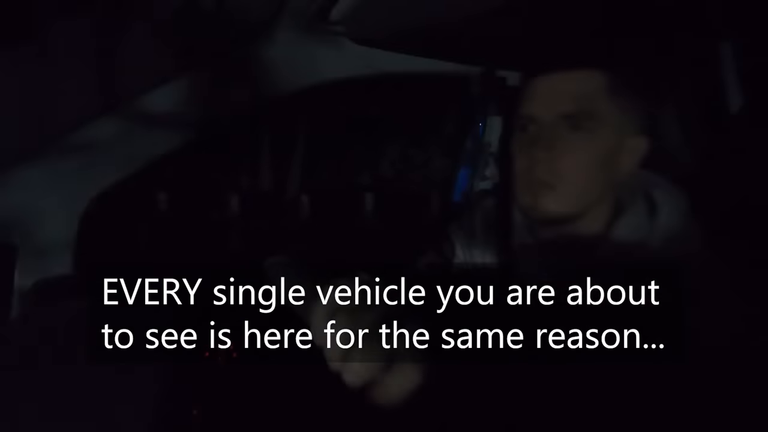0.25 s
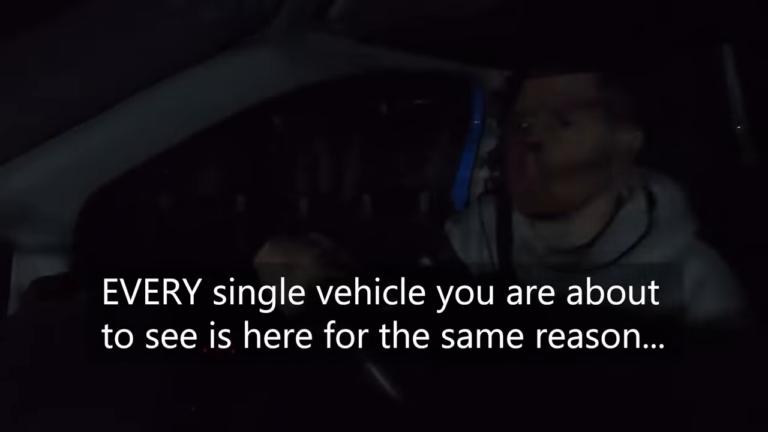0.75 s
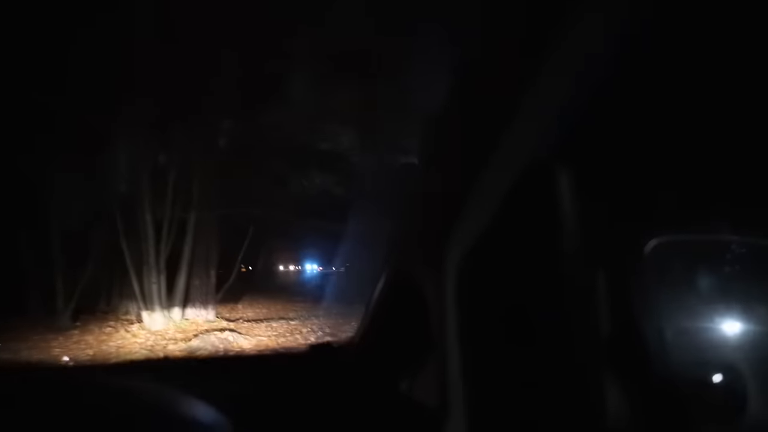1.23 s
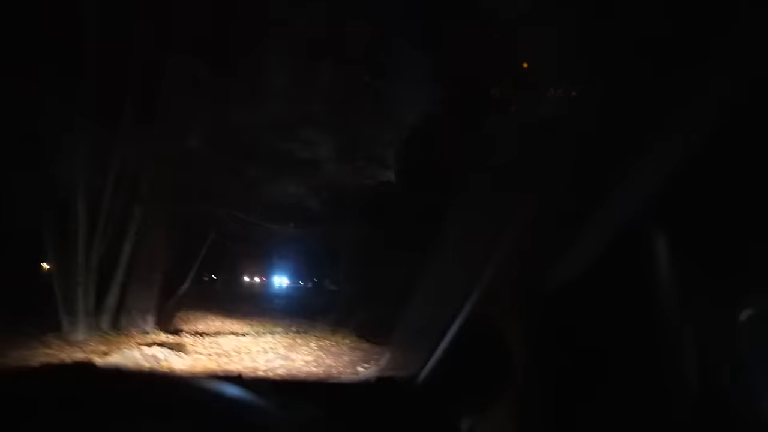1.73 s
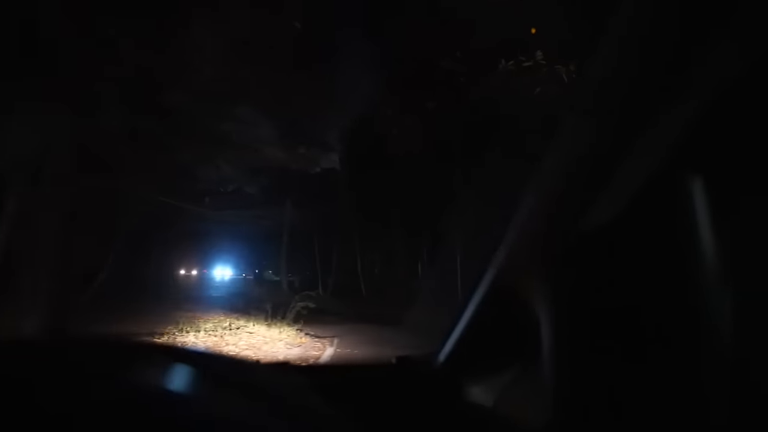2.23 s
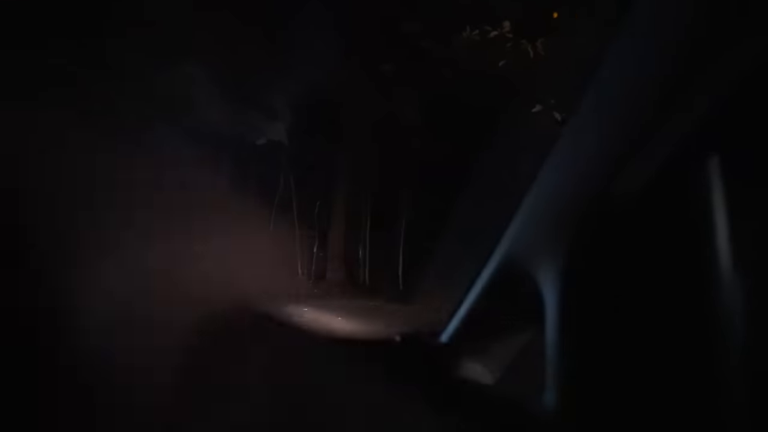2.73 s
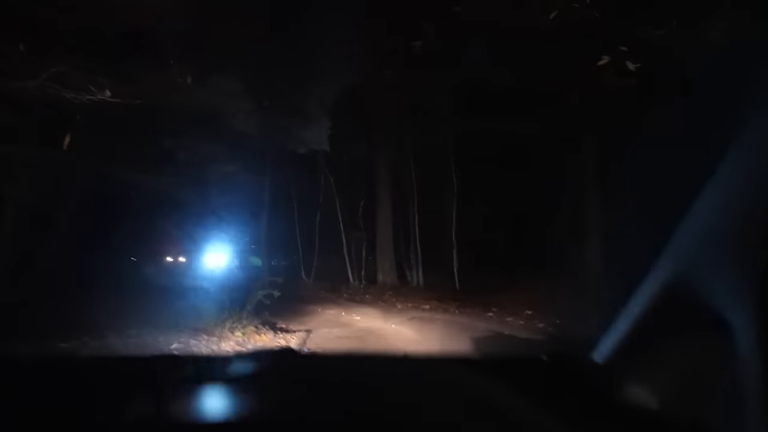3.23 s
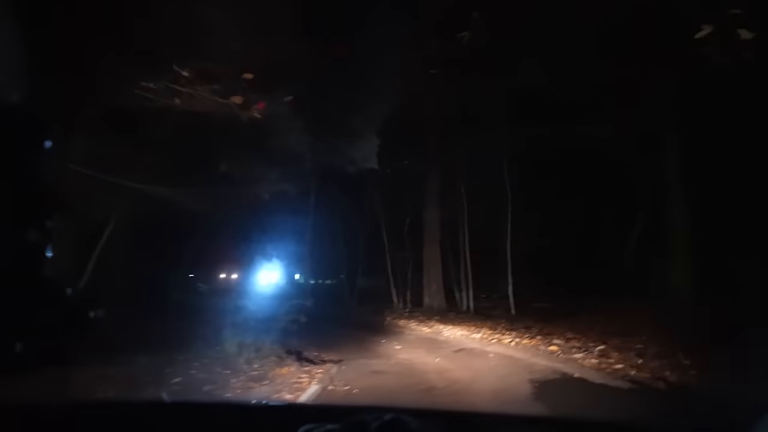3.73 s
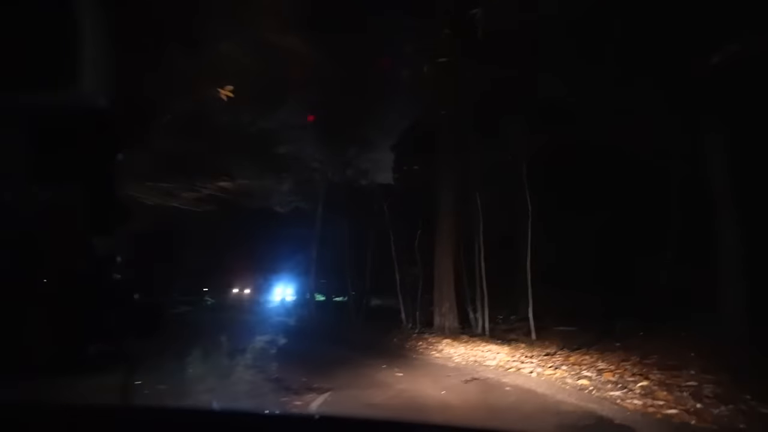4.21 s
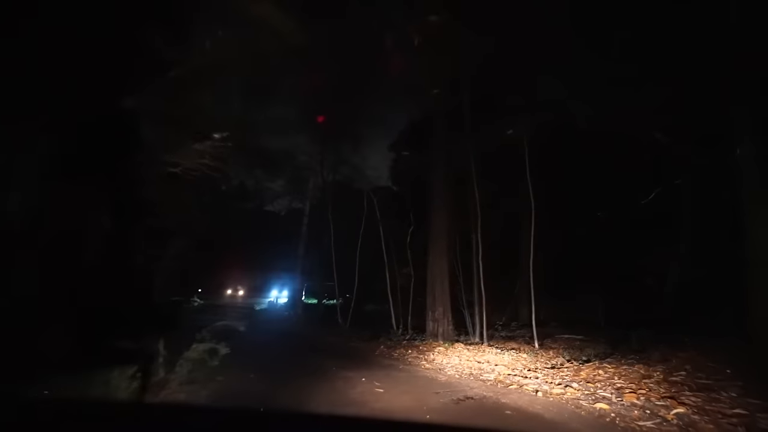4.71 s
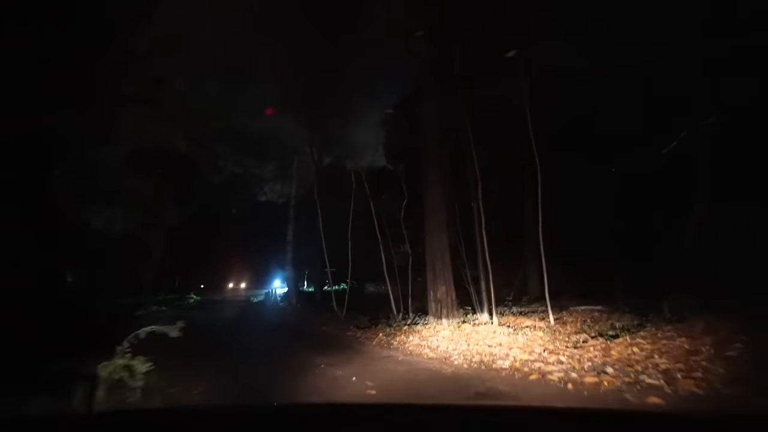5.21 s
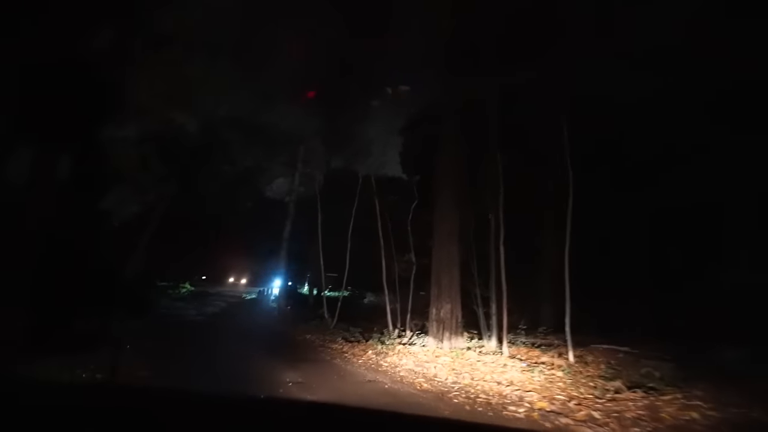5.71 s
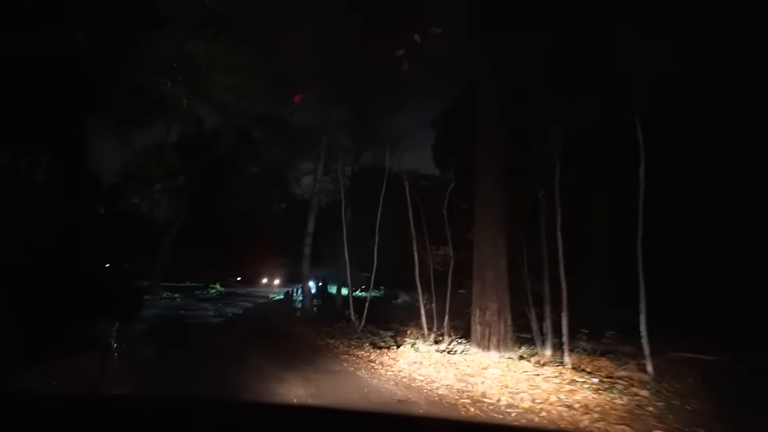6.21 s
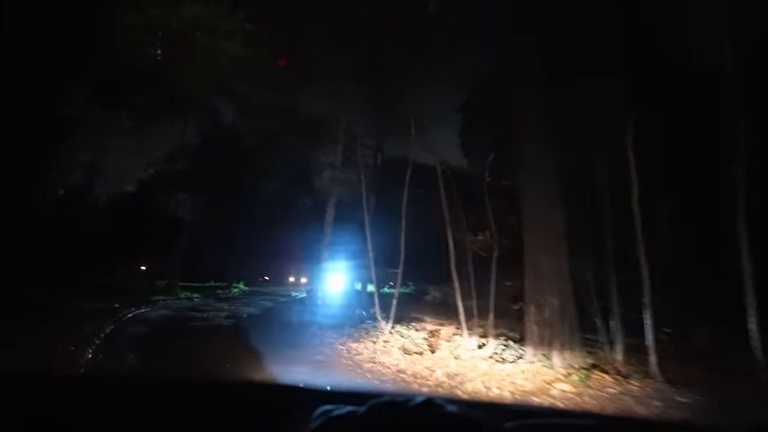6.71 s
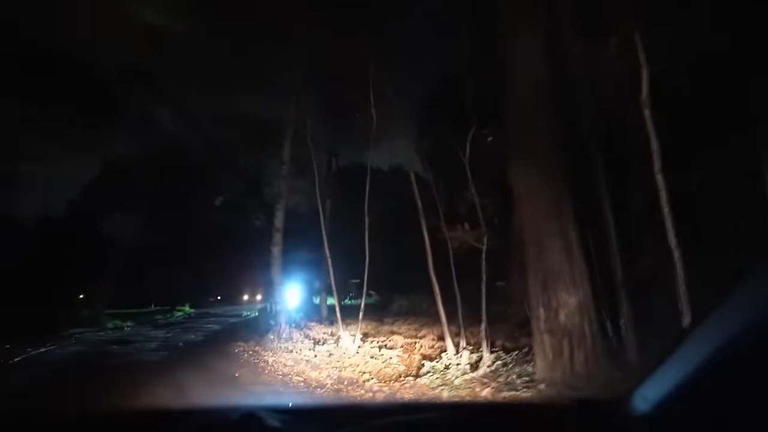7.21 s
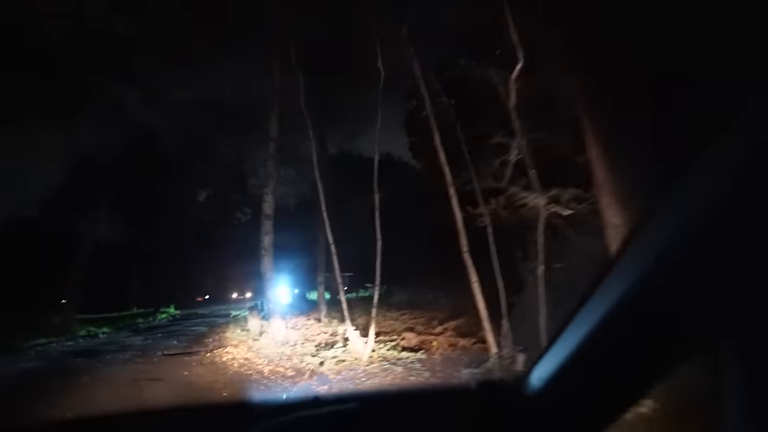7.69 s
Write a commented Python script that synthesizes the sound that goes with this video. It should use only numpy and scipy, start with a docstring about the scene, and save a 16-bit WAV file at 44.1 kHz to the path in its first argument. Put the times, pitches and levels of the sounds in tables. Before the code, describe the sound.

Low-revving van engine drones in a closed cabin over rough ground, with tyre crunch, jangling keys, sleeve swishes and trim rattles.

```python
"""An engine at low revs hums through the cabin of a small van on a bumpy track: a harmonic series of sines
follows speed and load. Filtered noise gives the belt's chirp, drivetrain whirr, body rumble, an early deep
flutter of air, tyre crunch and the swish of hands and sleeves on the wheel. Keys and their ring jingle as
decaying sines; loose trim knocks as noise bursts with short modes. Random slips excite creaking trim and a
skidding palm."""
import sys
import numpy as np
from scipy import signal
from scipy.fft import rfft, irfft
from scipy.io import wavfile
from scipy.ndimage import uniform_filter1d

SR = 44100
rng = np.random.default_rng(int(sys.argv[2]) if len(sys.argv) > 2 else 0)


def materialize(psi):
    """Save the field psi as 16-bit PCM at rate SR to the path in sys.argv[1].

    A 1-D psi becomes a single channel; in a 2-D psi each row is a channel.
    """
    bounded = np.clip(np.atleast_2d(psi).T, -1, 1)
    quanta = np.round(bounded * 32767).astype(np.int16)
    wavfile.write(sys.argv[1], SR, quanta)


N = 350595
TIME = np.arange(N) / SR
FREQS = np.maximum(np.fft.rfftfreq(N, 1 / SR), 1)
TOP_HZ = 16000

# Levels in the tables are relative; each source sets its own gain. Widths are full widths unless noted.
# engine speed: t/s, firing rate f/Hz
FIRING_RATE = [(0, 35.5), (.8, 40.6), (1.1, 41.1), (1.47, 37.17), (2.6, 32.37), (3.2, 34.46), (3.95, 34),
               (4.43, 37.4), (4.8, 37.15), (5.05, 39.06), (5.5, 39.2), (5.8, 40.24), (6.3, 40.3),
               (6.55, 42.32), (7.05, 42.71), (7.25, 43.5), (7.9, 43.07)]
# throttle: t/s, engine load level/dB
ENGINE_LOAD = [(.55, -63), (.9, -35.5), (1.38, -41), (1.65, -49), (3.1, -49), (3.5, -45), (4.16, -48.5),
               (4.23, -37), (5, -35.5), (5.3, -43), (6.5, -36.5), (7.9, -38.5)]
# engine harmonics: multiple of the firing rate [1], level/dB against the load
ENGINE_HARMONICS = [(1, -15), (2, -1.5), (3, -1), (4, 1.5), (5, -10.5), (6, -15.5), (7, -14), (8, -21.5),
                    (9, -18.5), (10, -18.5)]
# standing waves of the cabin: f/Hz, half width/Hz, lift/dB
CABIN_BOOMS = [(121.4, 2.4, 5), (146.7, 9.3, 6.5), (194.6, 3.1, 7.5), (376.7, 7.1, 7.5)]
# unsteadiness of the engine: share of its speed, level/dB of each multiple
ENGINE_JITTER, ENGINE_WAVER_DB = .002, 1.2

# firings in one turn of the drive belt
BELT_FIRINGS = 4.3
# drivetrain resonances: f/Hz, width/Hz, level/dB
WHIRR_RESONANCES = [(713, 67, 1.5), (840, 110, -8.5), (1297, 65, -3.5)]
# louder whirr in the turns: start t/s, length/s, level/dB
TURN_SWELLS = [(.7, 1.96, -57), (2.2, 1.6, -54.5)]

# rolling along the track: t/s, body rumble level/dB, panel drone level/dB, tyre crunch level/dB
ROLLING_LEVELS = [(0.15, -62, -50.5, -65), (0.21, -70, -51.5, -60), (0.37, -51, -50.5, -66.5),
                  (0.97, -31.5, -43.5, -60.5), (2.23, -36, -49.5, -65.5), (3.1, -36.5, -49, -60),
                  (3.63, -36.3, -45.5, -57.5), (6.75, -30, -44, -56), (7.84, -29.5, -45, -56.5),
                  (7.95, -27.5, -43, -56.5)]
# deeper ruts that jolt the body: start t/s, length/s, rumble level/dB
RUT_SWELLS = [(5.45, 0.19, -34.5), (5.66, 0.23, -29), (6.92, 0.42, -31), (7.58, 0.15, -28)]
# spectrum of the body rumble: f/Hz, level/dB per Hz
BODY_SPECTRUM = [(25, -55), (40, -11), (60, -9.5), (86, 2), (110, -6.5), (140, -6.5), (175, -11.5),
                 (215, -18), (300, -32)]
# spectrum of the panel drone: f/Hz, level/dB per Hz
PANEL_SPECTRUM = [(130, -21), (210, 0.5), (280, 1), (325, -14.5), (390, -2.5), (480, -4.5), (620, -9.5),
                  (1000, -13.5), (3000, -51)]
# panel resonances: f/Hz, width/Hz, level/dB
PANEL_RESONANCES = [(298.5, 5.9, 7), (358.6, 46, 3)]

# spectrum of the tyre crunch: f/Hz, level/dB per Hz
TYRE_SPECTRUM = [(350, -16), (560, 7), (1300, 4.5), (1750, 3.5), (2150, 0), (2650, 1), (3250, -4),
                 (4200, -9), (6000, -17), (16000, -18.5)]
# wheel arch resonances: f/Hz, width/Hz, level/dB
ARCH_RESONANCES = [(1100, 87, -8.5), (1407, 115, -3), (2120, 130, -2.5), (3190, 210, -9)]
# wander of the arch resonances: share of their pitch, level/dB
ARCH_DRIFT, ARCH_WANDER_DB = .022, 1.9
# crackling stones and twigs: rate per second, scatter in size/dB, level/dB against the hiss before filtering
GRIT_PER_S, GRIT_SCATTER_DB, GRIT_DB = 220, 4.4, -6.5
# rise of the fluttering air: t60/s
FLUTTER_RISE_T60 = .03

# strokes of hands and sleeves over the wheel: start t/s, length/s, level/dB
HAND_STROKES = [(0, 0.54, -74), (.63, 0.67, -57), (.85, 0.12, -52), (1.005, 0.046, -53.5),
                (2.58, 0.19, -74), (2.8, 0.46, -57), (3.2, 0.39, -63.5), (3.43, 0.44, -58.5),
                (4.12, 0.68, -59.5), (4.74, 0.21, -60.5), (4.85, 0.044, -49.5), (5.38, 0.5, -60.5)]
# spectrum of rubbing cloth: f/Hz, level/dB per Hz
CLOTH_SPECTRUM = [(1180, -58), (2000, -0.5), (3040, 4), (3650, 4), (5630, 4.5), (9090, 2), (13300, 4.5),
                  (15200, 3), (16000, -9)]
# shares of its length over which a gentle swell rises and dies away
RISE_SHARE, FALL_SHARE = .26, .45

# clashes in the bunch: t/s, ring level/dB of the tiny, small, medium and large key
KEY_CLASHES = [(0.021, -45, -29.5, -47, -39), (0.219, -73, -50, -62, -63), (0.2633, -56, -45, -38.5, -45),
               (0.3156, -57, -50, -37.5, -58), (0.5746, -45, -28.5, -48, -37), (0.592, -45, -33, -47, -37),
               (0.608, -49, -35.5, -53, -39), (1.3254, -53, -58, -62, -63), (1.5712, -54, -55, -55, -57),
               (1.708, -76, -64, -70, -67), (1.914, -50, -56, -66, -62), (2.031, -65, -61, -74, -62),
               (2.3778, -55, -57, -73, -61), (2.3945, -50.5, -63, -75, -56), (2.8444, -50, -57, -65, -60),
               (3.2161, -50, -56, -65, -54), (3.3433, -40, -40, -64, -61), (3.374, -41, -54, -62, -60),
               (3.479, -43.5, -51, -57, -60), (3.9749, -54, -58, -69, -59), (4.353, -48, -59, -64, -58),
               (4.6309, -56, -54, -62, -60), (4.9262, -50, -64, -71, -70), (5.0534, -45, -51, -62, -59),
               (5.9407, -37, -39.5, -51, -58), (6.0985, -29, -35, -60, -41), (6.2866, -34, -31, -37, -53),
               (6.323, -29, -27.5, -41, -53), (6.548, -40, -44.5, -44, -43), (6.7291, -57, -60, -69, -52),
               (7.0519, -66, -53, -69, -68), (7.1317, -76, -55, -57, -58), (7.2549, -57, -64, -76, -72),
               (7.3811, -52, -48.5, -54, -72), (7.5717, -57, -49, -56, -55),
               (7.7447, -28, -33, -39.5, -40.5)]
# modes of the keys: key 0-3 (tiny to large), f/Hz, level/dB, t60/s
KEY_RESONANCES = [(0, 13808, 0, .45), (1, 10712, -3, .17), (1, 10960, 0, .065), (2, 6788, 0, .09),
                  (3, 5750, 0, .07)]
# scrape of edge on edge at each clash: t60/s
TICK_T60 = .045
# shortest and longest wait for the one rebound after a clash: t/s
REBOUND_S = (.005, .02)
# scatter in strength of the random grazes, and waver of a ring as the bunch swings: level/dB
GRAZE_SCATTER_DB, SWING_DB = 4, 3.5
# steel ring that holds the keys: t/s, level/dB, time of free ringing/s
RING_STRIKES = [(0.03, -67, 0.45), (5.942, -61.5, 0.19), (6.102, -50.5, 0.21), (7.82, -69, .12)]
# tiny key brushed by the swinging bunch: start t/s, length/s, level/dB
KEY_BRUSHES = [(1.62, 0.56, -68), (6.48, .24, -48), (6.95, .7, -66)]

# taps of loose trim: t/s, crack level/dB, top of the crack f/Hz, thud level/dB, centre of the thud f/Hz
TRIM_TAPS = [(.2137, -47, 4500, -51, 1400), (.9145, -34, 7000, -53, 2100), (1.3772, -53, 6000, -41, 1450),
             (1.5575, -48, 4000, -36, 850), (2.8317, -31, 12000, -47, 2100), (4.1175, -46, 6000, -43, 2100),
             (4.8773, -32, 6000, -57, 2500), (5.178, -32, 14000, -45, 1400),
             (5.2475, -27, 14000, -44, 2400), (5.7199, -35, 5500, -38, 2200),
             (6.3987, -40, 5000, -43, 2300), (6.832, -41, 6000, -39, 1900), (7, -38, 12000, -52, 2100),
             (7.4414, -56, 3500, -35, 870), (7.6456, -35.5, 6500, -42, 2200),
             (7.6597, -48, 5000, -36, 1050), (7.667, -50, 4000, -42, 2000)]
# modes of the trim: f/Hz, level/dB, t60/s
TRIM_RESONANCES = [(600, -1, .06), (930, -1, .045), (1430, -1, .04), (2104, -6, .03), (2570, -6, .03)]
# octaves from a tap's pitch at which the gain of a mode falls to 1/e
TAP_REACH_OCTAVES = 0.95
# rise of a whole tap and decay of its crack: t60/s
TAP_RISE_T60, CRACK_T60 = .002, .018
# factor by which the thud's band reaches below and above its pitch, and level/dB of the bounce
THUD_SPAN, BOUNCE_DB = 1.35, -12

# creaks of trim under strain: start t/s, length/s, level/dB
CREAK_SWELLS = [(.87, 0.06, -53), (4.73, 0.14, -52.5), (4.85, 0.034, -41.5)]
# resonances of the rasping trim: f/Hz, width/Hz, level/dB
CREAK_RESONANCES = [(3520, 350, 5), (4300, 480, 4), (6300, 900, -12)]
# shares of its length over which a creak mounts and breaks off
CREAK_RISE_SHARE, CREAK_FALL_SHARE = .85, .12

# palm skidding along the rim: start t/s, length/s, level/dB
PALM_SKIDS = [(2.925, 0.26, -47), (5.17, 0.095, -49), (5.244, 0.09, -43)]
# spectrum of the skidding palm: f/Hz, level/dB per Hz
PALM_SPECTRUM = [(1500, -30), (2000, -8.5), (4000, -1), (6000, 4.5), (9500, 5), (13000, 9.5), (15500, 3)]
# resonances of the rim under the palm: f/Hz, width/Hz, level/dB
RIM_RESONANCES = [(2154, 330, 3.5), (3200, 530, 1.5), (4460, 450, -3)]
# side against mid in the cabin: f/Hz, level/dB
STEREO_WIDTH = [(30, -29), (60, -21), (130, -23.5), (250, -7), (1000, -5.5), (2500, -1), (14000, 2)]


def undb(db):
    """Logarithmic level: decibels to amplitude gain."""
    return 10 ** (np.asarray(db) / 20)


def unit(x):
    """Normalisation to an rms of 1."""
    return x / np.sqrt(np.mean(x ** 2))


def curves(table):
    """Linear interpolation in time of every column of a table."""
    s, *columns = np.transpose(table)
    return [np.interp(TIME, s, column) for column in columns]


def walk(rate):
    """Smoothed random steps, held 1 / rate seconds and slewed twice; spread near 1."""
    hold = int(SR / rate)
    steps = np.repeat(rng.standard_normal(N // hold + 1), hold)
    return 1.3 * uniform_filter1d(uniform_filter1d(steps, hold), hold)[:N]


def fade(t, t60):
    """Exponential decay by 60 dB in t60 seconds."""
    return np.exp(-np.log(1000) * t / t60)


def swells(table, rise_share=RISE_SHARE, fall_share=FALL_SHARE):
    """Power addition of overlapping gestures, each a smooth rise, hold and fall; gives a gain."""
    power = np.zeros(N)
    for s, length_s, db in table:
        i = slice(max(int(s * SR), 0), int((s + length_s) * SR))
        along = (TIME[i] - s) / length_s
        shape = np.clip(np.minimum(along / rise_share, (1 - along) / fall_share), 0, 1)
        power[i] += (undb(db) * np.sin(np.pi / 2 * shape)) ** 2
    return np.sqrt(power)


def noise():
    """Statistical independence: two unrelated white noises."""
    return rng.standard_normal((2, N))


def band_noise(lo_hz, hi_hz, size):
    """Band limitation of a short stretch of two-channel noise, at an rms of 1."""
    sos = signal.butter(2, [lo_hz, min(hi_hz, SR / 2 - 100)], "band", fs=SR, output="sos")
    return unit(signal.sosfilt(sos, rng.standard_normal((2, size))))


def response(points):
    """Spectral shaping: gain through the given points, with skirts that fall away beyond the ends."""
    hz, db = np.transpose(points)
    skirts = np.minimum(FREQS / hz[0], 1) ** 2 * np.minimum(hz[-1] / FREQS, 1) ** 2
    return undb(np.interp(np.log(FREQS), np.log(hz), db)) * skirts


def resonance(hz, width_hz):
    """Damped oscillator: complex response with gain 1 at its centre."""
    return 1 / (1 + 1j * (FREQS ** 2 - hz ** 2) / (FREQS * width_hz))


def ringing(modes):
    """Modal summation: gain of several resonances, each squared for steeper flanks."""
    # squaring narrows the peak, so the width is widened to make up for it
    return sum(undb(db) * np.abs(resonance(hz, 1.4 * width_hz)) ** 2 for hz, width_hz, db in modes)


def cabin(pair, gain):
    """Diffuse field: coloured excitations, alike in both ears in the bass and unlike in the treble; rms 1."""
    mid, side = rfft(pair) * gain
    side = side * response(STEREO_WIDTH)
    return unit(irfft([mid + side, mid - side], N))


def pan(db):
    """Interaural level difference: left and right gains."""
    return undb(np.array([[db], [-db]]) / 2)


def glide(pair, ratio):
    """Time-varying resampling: pitch shifted by a ratio that changes in time."""
    position = np.cumsum(ratio) % N
    return np.array([np.interp(position, np.arange(N), ear) for ear in pair])


def add(out, s, sound):
    """Superposition of a sound that starts at s seconds."""
    i = min(max(int(s * SR), 0), N)
    out[:, i:i + sound.shape[1]] += sound[:, :N - i]


def engine(level_db=-1.0, ear_lag=0.1):
    """Harmonic series of the firing rate, scaled by load and lifted where it crosses cabin standing waves."""
    hz = curves(FIRING_RATE)[0] * (1 + ENGINE_JITTER * walk(14))
    phase = 2 * np.pi * np.cumsum(hz) / SR
    load_db, = curves(ENGINE_LOAD)
    # radians; standing waves put the multiples to alternate sides
    ears = ear_lag * np.array([[-1], [1]])
    hum = 0
    for multiple, db in ENGINE_HARMONICS:
        k = round(multiple)
        boom_db = 0
        for boom_hz, half_width_hz, lift_db in CABIN_BOOMS:
            boom_db = boom_db + lift_db / (1 + ((k * hz - boom_hz) / half_width_hz) ** 2)
        gain = undb(load_db + db + boom_db + ENGINE_WAVER_DB * walk(10))
        hum = hum + gain * np.sin(k * phase + (-1) ** k * ears + rng.uniform(0, 2 * np.pi))
    return np.sqrt(2) * undb(level_db) * hum


def belt(level_db=-63, hz=3130, width_hz=200, chirp_share=0.12):
    """Periodic excitation: a worn patch of the belt chirps softly each time it meets the pulley."""
    turn = np.cumsum(curves(FIRING_RATE)[0]) / SR / BELT_FIRINGS % 1
    chirp = np.exp(-((turn - .5) / chirp_share) ** 2)
    return undb(level_db + walk(6.1)) * chirp * cabin(noise(), ringing([(hz, width_hz, 0)]))


def whirr(turn_db=2.0, straight_db=-13, rest_hz=34, pitch_law=.33):
    """Resonant noise of the drivetrain, louder in the turns; its pitch is a power law of engine speed."""
    gain = np.hypot(undb(curves(ROLLING_LEVELS)[1] + straight_db), undb(turn_db) * swells(TURN_SWELLS))
    # rest_hz is the firing rate at which the pitch is unshifted
    ratio = (curves(FIRING_RATE)[0] / rest_hz) ** pitch_law
    return gain * glide(cabin(noise(), ringing(WHIRR_RESONANCES)), ratio)


def track(shake_db=1.5):
    """Forced vibration: rough ground shakes the body into rumble and its panels into a resonant drone."""
    rumble_db, drone_db, _ = curves(ROLLING_LEVELS)
    body_gain = np.hypot(undb(rumble_db), swells(RUT_SWELLS))
    body = body_gain * cabin(noise(), response(BODY_SPECTRUM))
    panel_gain = undb(drone_db + shake_db * walk(25))
    panels = panel_gain * cabin(noise(), response(PANEL_SPECTRUM) + ringing(PANEL_RESONANCES))
    return body + panels


def tyres(hiss_db=7.0, arch_db=-2, shake_db=1.85, pan_db=-2.0):
    """Impulsive and steady excitation: stones crackle and dirt hisses, ringing drifting wheel arch modes."""
    sizes = undb(GRIT_SCATTER_DB * np.minimum(rng.exponential(size=N), 4))
    hits = rng.random(N) < GRIT_PER_S / SR
    grit = unit(np.sign(noise()) * sizes * hits)
    ground = noise() + undb(GRIT_DB) * grit
    sound = undb(hiss_db) * cabin(ground, response(TYRE_SPECTRUM))
    for hz, width_hz, db in ARCH_RESONANCES:
        ring = glide(cabin(ground, ringing([(hz, width_hz, db)])), 1 + ARCH_DRIFT * walk(0.99))
        sound = sound + undb(arch_db + db + ARCH_WANDER_DB * walk(2)) * ring
    crunch_db = curves(ROLLING_LEVELS)[2]
    return pan(pan_db) * undb(crunch_db + shake_db * walk(30)) * sound


def air_flutter(level_db=-21, onset_db=9, onset_s=0.23, sink_db_per_s=5, end_s=0.99, end_t60=0.094,
                centre_hz=19, width_hz=11):
    """Narrow-band noise: a deep flutter of air below the engine note, strongest at first, then sinking."""
    flutter = irfft(rfft(rng.standard_normal(N)) * resonance(centre_hz, width_hz) ** 2, N)
    # dividing by its running rms keeps the flutter even
    running_rms = np.sqrt(np.abs(uniform_filter1d(flutter ** 2, size=6000)))
    db = level_db + onset_db * np.exp(-TIME / onset_s) - sink_db_per_s * TIME
    # it fades out quickly after end_s
    envelope = (1 - fade(TIME, FLUTTER_RISE_T60)) * fade(np.maximum(TIME - end_s, 0), end_t60)
    return undb(db) * flutter / running_rms * envelope


def swishes(level_db=9.5, rough_db=1.54, rest_db=-67, catch_db=-4, catches_per_s=1500):
    """Sliding friction: cloth and palms hiss over the wheel rim with fine, random catches."""
    slide = swells(HAND_STROKES) * undb(level_db + rough_db * walk(180))
    catches = undb(catch_db) * unit(1.0 * (rng.random(N) < catches_per_s / SR))
    return (slide + undb(rest_db)) * cabin(noise() * (1 + catches), response(CLOTH_SPECTRUM))


def keys(key_db=(4, 3.5, 2.5, 2.5), tick_db=-10, tick_lo_hz=3900, rebound_db=-10, strike_db=3.0,
         spread=0.74, flight_s=0.75, mute_t60=0.24, attack_t60=0.0076, beam_db=-7.0,
         graze_db=(-72, -68, -72, -70), count=30):
    """Free modal vibration: keys clash, rebound and ring, wavering as they swing, until contact mutes them."""
    out, t = np.zeros((2, N)), np.arange(SR // 3) / SR
    # besides the listed clashes the keys graze each other at random
    grazes = []
    for _ in range(count):
        s = rng.uniform(0, N / SR)
        grazes.append((s, *(graze_db + GRAZE_SCATTER_DB * rng.standard_normal(len(graze_db)))))
    for s, *rings_db in list(KEY_CLASHES) + grazes:
        blows = undb(np.add(rings_db, key_db))
        clash = np.zeros((2, len(t)))
        for key, hz, db, t60 in KEY_RESONANCES:
            key = int(key)
            phase = rng.uniform(0, 2 * np.pi) + spread * rng.standard_normal((2, 1))
            swing_hz = rng.uniform(5.4, 20.3, (2, 1))
            swing = np.sin(2 * np.pi * swing_hz * t + rng.uniform(0, 2 * np.pi, (2, 1)))
            # the tiny key beams its shrill ring to one side
            beam = pan(0 if key else beam_db)
            # each clash lands on another spot and favours other modes
            strike = undb(strike_db * rng.uniform(-0.67, 1))
            ring = strike * np.sin(2 * np.pi * hz * t + phase) * fade(t, t60)
            clash += blows[key] * undb(db + SWING_DB * swing) * beam / beam.mean() * ring
        tick = band_noise(tick_lo_hz, TOP_HZ, len(t))
        clash += blows.max() * undb(tick_db) * fade(t, TICK_T60) * (tick + tick[::-1] / 2)
        # a harder blow to the tiny key throws the bunch apart for longer
        free_s = flight_s * np.sqrt(blows[0])
        clash *= (1 - fade(t, attack_t60)) * fade(np.maximum(t - free_s, 0), mute_t60)
        add(out, s - .001, clash)
        add(out, s + rng.uniform(*REBOUND_S), undb(rebound_db) * clash)
    return out


def key_ring(hz=4535, t60=5.5, mute_t60=0.4, pan_db=-6):
    """Light damping: the steel ring sings on faintly while it hangs free, then is muted."""
    out, t = np.zeros((2, N)), np.arange(SR) / SR
    for s, db, free_s in RING_STRIKES:
        envelope = (1 - fade(t, 0.017)) * fade(t, t60) * fade(np.maximum(t - free_s, 0), mute_t60)
        add(out, s, pan(pan_db) * undb(db) * envelope * np.sin(2 * np.pi * hz * t))
    return out


def knocks(thud_db=-2.5, thud_t60=0.061, crack_db=-2, bounce_s=0.0072, detune=0.029, spread=0.73):
    """Impact excitation: loose trim taps and bounces with a dry crack, a dull thud and brief panel modes."""
    out, t = np.zeros((2, N)), np.arange(SR // 10) / SR
    for s, crack_level_db, top_hz, thud_level_db, pitch_hz in TRIM_TAPS:
        for wait_s, blow_db in [(0, 0), (bounce_s * rng.uniform(0.56, 1.4), BOUNCE_DB)]:
            thud = fade(t, thud_t60) * band_noise(pitch_hz / THUD_SPAN, pitch_hz * THUD_SPAN, len(t))
            # each ear also hears the other side of the dashboard
            panel = thud + thud[::-1] / 2
            for hz, db, t60 in TRIM_RESONANCES:
                share = np.exp(-(np.log2(hz / pitch_hz) / TAP_REACH_OCTAVES) ** 2)
                mode_hz = hz * (1 + detune * rng.standard_normal())
                phase = 2 * np.pi * mode_hz * t + spread * rng.standard_normal((2, 1))
                panel = panel + share * undb(db) * fade(t, t60) * np.sin(phase)
            crack = undb(crack_level_db + crack_db) * fade(t, CRACK_T60) * band_noise(1400, top_hz, len(t))
            tap = undb(thud_level_db + thud_db) * panel + crack + crack[::-1] / 2
            add(out, s + wait_s, undb(blow_db) * tap * (1 - fade(t, TAP_RISE_T60)))
    return out


def creaks(slips_per_s=1500):
    """Stick-slip friction: plastic edges rasp in a quick, mounting run of tiny clicks that breaks off."""
    slips = noise() * (rng.random(N) < slips_per_s / SR)
    gain = swells(CREAK_SWELLS, CREAK_RISE_SHARE, CREAK_FALL_SHARE)
    return gain * cabin(slips, ringing(CREAK_RESONANCES))


def key_shimmer(width_hz=14):
    """Sustained narrow-band excitation: brushed by its neighbours, the tiny key keeps up a flickering ring."""
    _, hz, db, _ = KEY_RESONANCES[0]
    return swells(KEY_BRUSHES) * cabin(noise(), ringing([(hz, width_hz, db)]))


def skids(level_db=8.5, rough_db=1.0, rise_share=0.067, slips_per_s=2200, hiss_db=-4):
    """Stick-slip friction: skin rasps on the rim, abrupt and grainy, and excites the wheel's resonances."""
    slips = unit(noise() * (rng.random(N) < slips_per_s / SR))
    friction = slips + undb(hiss_db) * noise()
    rasp = cabin(friction, response(PALM_SPECTRUM) + ringing(RIM_RESONANCES))
    return swells(PALM_SKIDS, rise_share) * undb(level_db + rough_db * walk(220)) * rasp


def scene():
    """Superposition of all sources as heard from the front seats."""
    van = engine() + belt() + whirr() + track() + tyres() + air_flutter()
    return van + swishes() + skids() + keys() + key_shimmer() + key_ring() + knocks() + creaks()


def record(dry):
    """Band limitation: a steep elliptic low-pass cuts the top of the treble."""
    return signal.sosfilt(signal.ellip(8, .2, 70, TOP_HZ, fs=SR, output="sos"), dry)


dry = scene()
out = record(dry)
materialize(out)
```